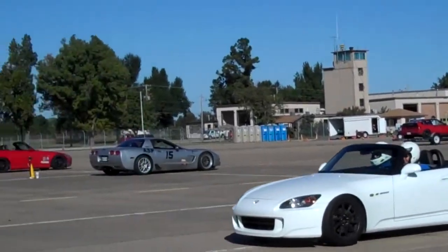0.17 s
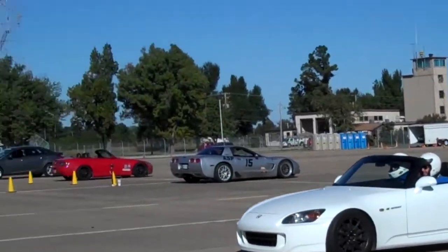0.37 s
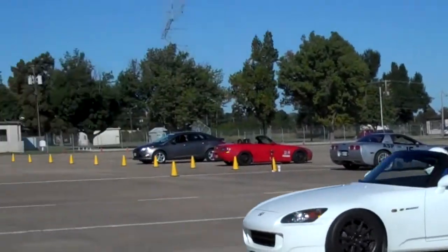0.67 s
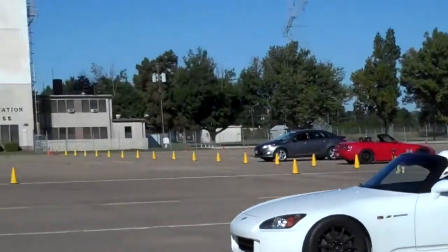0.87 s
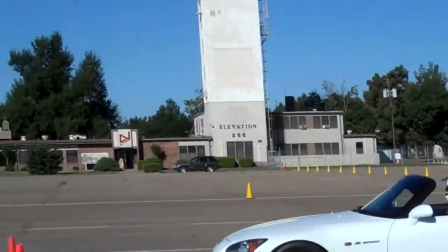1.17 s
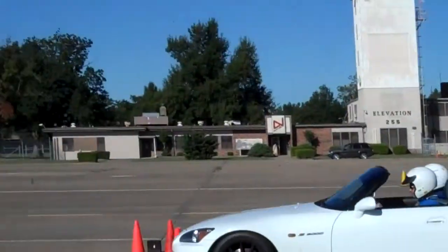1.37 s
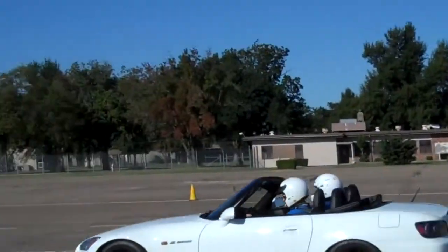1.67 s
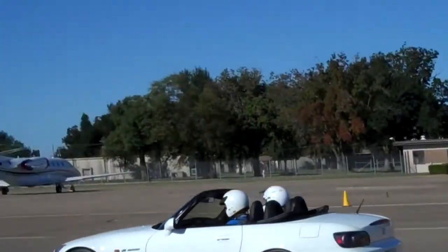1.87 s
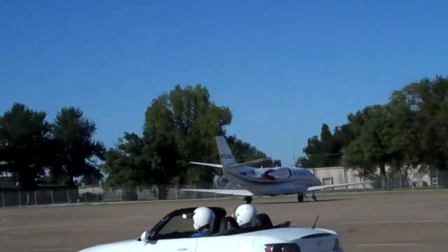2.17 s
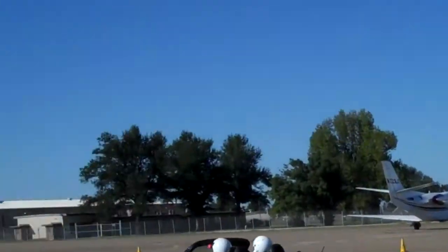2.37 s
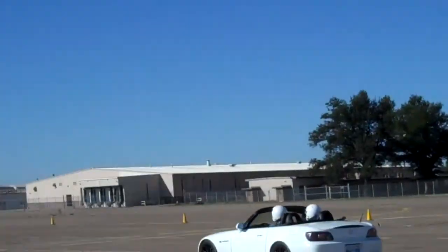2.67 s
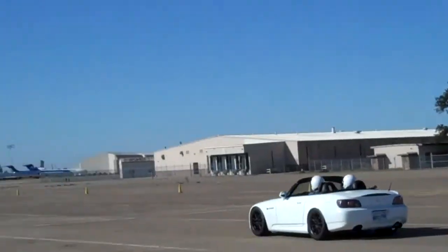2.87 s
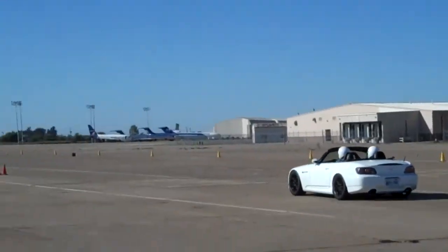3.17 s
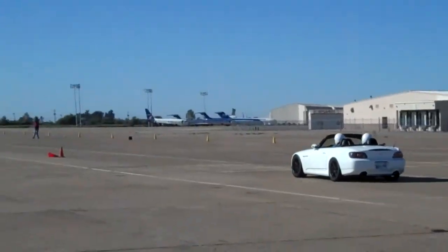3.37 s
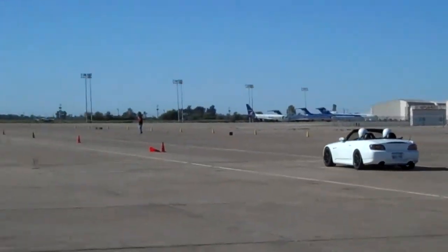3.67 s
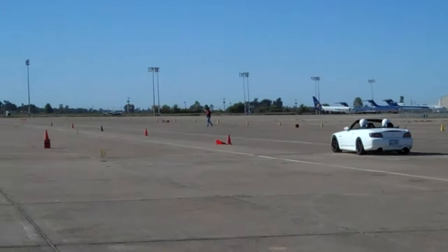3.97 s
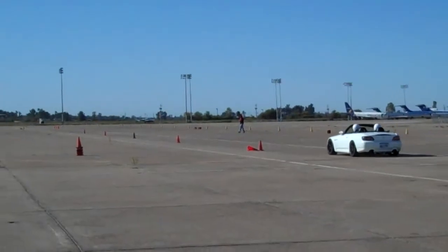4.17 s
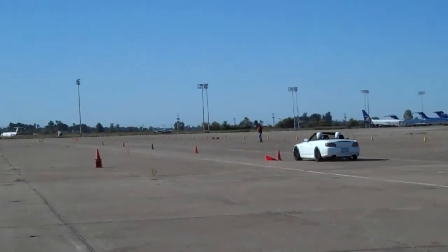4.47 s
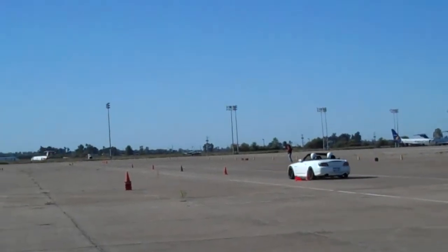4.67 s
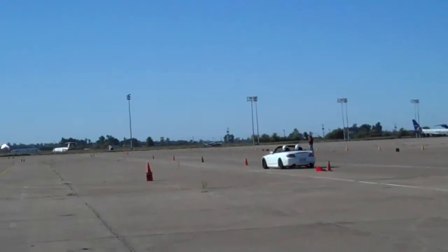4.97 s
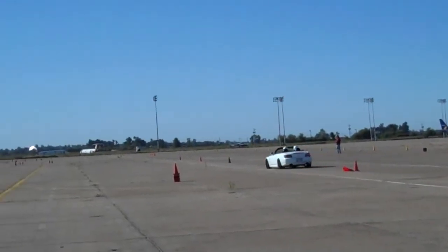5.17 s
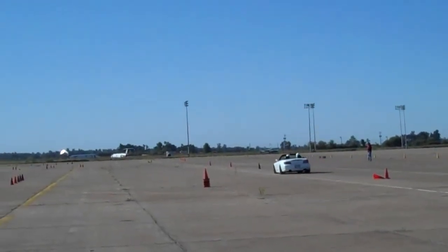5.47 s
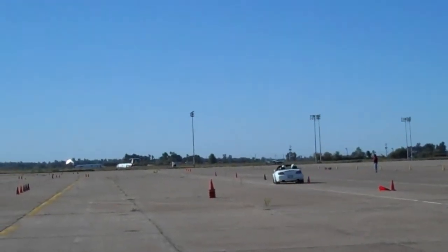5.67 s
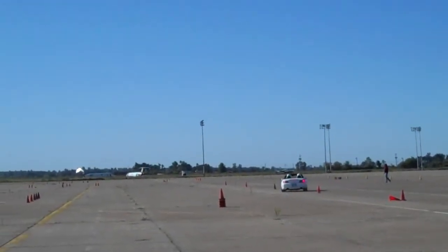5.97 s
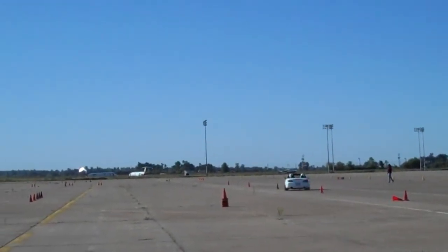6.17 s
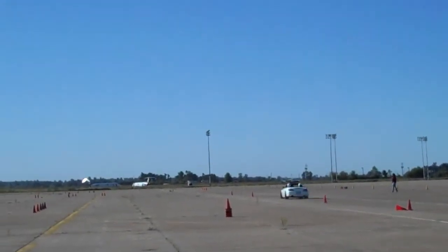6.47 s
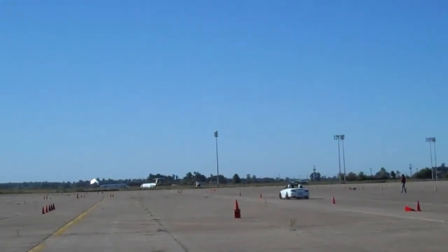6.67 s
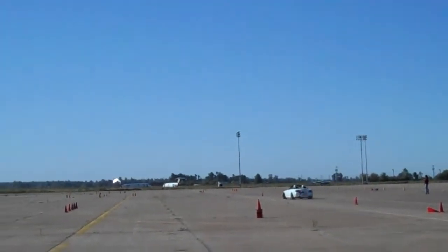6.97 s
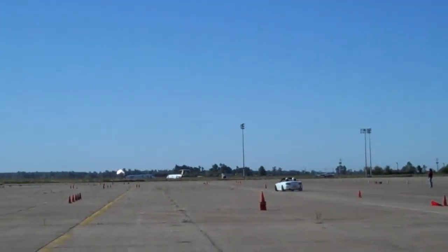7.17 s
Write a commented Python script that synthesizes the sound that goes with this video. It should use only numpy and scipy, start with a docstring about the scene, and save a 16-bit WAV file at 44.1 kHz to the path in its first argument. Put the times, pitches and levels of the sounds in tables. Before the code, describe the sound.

A small sports car starts with popping, uneven firings and bright tyre scrub, then revs out first gear in a rising bark. The throttle closes, a short burble marks the shift, and a lower note climbs again, thinner and farther off. It lifts and wavers at the end. The open airfield is faintly noisy, and wind increasingly flutters and thuds on the unprotected microphone.

```python
"""Open sports car launching on an airfield

A four-cylinder car launches with hollow pops, revs out first gear, shifts with a burble, pulls through
second and lifts off. Firing pulses build its note, rasp, bite, snarl and growl; shaped noise makes the
tyres hissing on concrete, the far field and the gusts. Each of two microphone ports has its own wind,
mostly stronger on the right, with single thumps of pressure on top; small sharp ticks complete the scene.
"""
import sys
import numpy as np
from scipy import signal
from scipy.fft import rfft, irfft, next_fast_len
from scipy.io import wavfile
from scipy.ndimage import uniform_filter1d

SR = 44100
rng = np.random.default_rng(int(sys.argv[2]) if len(sys.argv) > 2 else 0)


def digitize_waveform(pressure):
    """Quantize a signal to 16-bit integers and store it at the path in sys.argv[1].

    Rows of a 2-D input are taken as channels; values are limited to [-1, 1].
    """
    field = np.atleast_2d(pressure).T
    bounded = np.clip(field, -1, 1)
    quanta = np.round(bounded * 32767).astype(np.int16)
    wavfile.write(sys.argv[1], SR, quanta)


N = 323253

# engine speed before its fine wobble: t/s, firing rate f/Hz
FIRING_RATE = [(0, 73.5), (.25, 77.9), (.36, 91.96), (.6, 104.4), (.72, 113.7), (1.1, 139.7), (1.61, 174.1),
               (2.53, 235.9), (2.8, 219.7), (3.18, 186.2), (3.28, 152.4), (3.44, 167), (3.58, 165.3),
               (4.7, 200.9), (5.13, 217.7), (5.22, 208.2), (5.8, 197.7), (5.95, 202.9), (6.1, 193.9),
               (6.3, 194.5), (6.5, 186.3), (6.8, 186.2), (7.05, 188.1), (7.33, 191.8)]
# exhaust loudness before the trims of each layer: t/s, low boom level/dB, bark level/dB
EXHAUST_LEVELS = [(0, -27.5, -34), (.1, -20.5, -24.5), (.26, -17.5, -27.5), (.4, -14, -19.5),
                  (.95, -12, -18.5), (1.08, -10, -26), (1.2, -12, -19), (1.65, -14.5, -15),
                  (2.15, -17, -15), (2.53, -26.5, -21), (2.61, -38, -37), (3.17, -41, -30),
                  (3.26, -19.5, -39), (3.4, -28.5, -23.5), (3.68, -30.5, -22), (4.0, -25.5, -20),
                  (4.37, -21, -17.5), (4.7, -21.5, -19), (5.145, -21.5, -17.5), (5.19, -30, -38),
                  (5.42, -29.5, -23), (5.95, -34, -24.5), (6.08, -29, -40), (6.24, -28.5, -27),
                  (6.5, -28.5, -40), (6.66, -26.5, -32.5), (6.86, -30, -35), (7.05, -23.5, -26)]
# driver on the throttle: start t/s, end t/s, opening (0-1)
THROTTLE_PULLS = [(-.1, 2.56, 0.94), (3.23, 5.16, 1), (7.09, 7.5, 0.53)]
PEDAL_S = 0.06  # time to open or close the throttle
# middle revs where the engine runs rough: firing rate f/Hz, roughness (0-1)
ROUGH_REVS = [(120, 0), (135, 1), (152, 1), (168, 0)]

# firing harmonics 1 to 4: trim/dB, share following bark rather than boom (0-1), change off throttle/dB
HARMONICS = [(-2, 0.08, 1.5), (-2, 0.25, -1.5), (0.6, 1, -0.5), (-1, 1, -33)]
# how strongly the exhaust passes an overtone as it sweeps: f/Hz, gain/dB
OVERTONE_GAIN = [(170, -14.5), (195, -0.5), (220, -4.5), (305, -17), (345, -5.5), (375, -5.5), (398, -9),
                 (440, -13), (480, -14.5), (570, -5.5), (650, -4.5), (720, -4), (780, -5.5), (850, -21.5),
                 (885, -39), (915, -9), (950, -8)]
WAVER_DB, ROUGH_WAVER_DB = 1.1, 3  # swell of each overtone, and its increase when running rough
# exhaust pipe resonances: f/Hz, nominal width/Hz, gain/dB
PIPE_RESONANCES = [(378, 196, 1), (618, 150, 7.5), (806, 19, -13.5), (1390, 68, -22)]
# strength of each firing in turn: gain
CYLINDER_STRENGTHS = [1.3, .97, .85, .88]

# spectrum of the rasp of the tailpipes: f/Hz, gain/dB
RASP_SPECTRUM = [(400, 31.5), (650, 38.5), (880, 12.5), (1030, -1), (1230, 5.5), (1430, -1), (1580, -19),
                 (1850, -19.5), (2080, -15), (2300, -18), (2650, -16), (3300, -77)]
RASP_OFF_DB = -13  # change of the rasp with the throttle shut
# spectrum of the biting tailpipe overtones: f/Hz, gain/dB
BITE_SPECTRUM = [(800, -11), (1100, 1.5), (1250, 7), (1400, 18.5), (1600, 7), (1850, -16), (2080, -14),
                 (2300, -18.5), (2650, -16.5), (3200, -40.5)]
# loudness of the bite, near 1.4 kHz: t/s, level/dB
BITE_LEVEL = [(1.0, -66), (1.3, -41), (1.58, -32), (1.97, -31), (2.08, -27.5), (2.22, -29.5), (2.31, -34.5),
              (2.52, -32), (2.62, -71), (3.35, -59), (3.65, -50), (4.0, -44.5), (4.2, -52), (4.42, -60),
              (4.52, -36.5), (4.73, -50), (4.88, -38), (5.11, -42), (5.22, -44.5), (5.6, -61.5),
              (7.03, -55), (7.11, -47), (7.22, -43), (7.33, -63)]
# strength of each firing in turn as it reaches the tailpipes: gain
TAILPIPE_STRENGTHS = [1.9, .8, .7, .5]
# loudness of the snarl of gas above the bite: t/s, level/dB
SNARL_LEVEL = [(.3, -44), (.72, -43), (.94, -32), (1.04, -48), (1.6, -43), (1.85, -39), (2.05, -33.5),
               (2.25, -42), (2.52, -43), (2.62, -61), (3.4, -59), (3.66, -48), (4.0, -42), (4.22, -47),
               (4.37, -43.5), (4.64, -44.5), (4.75, -50), (5.09, -40.5), (5.2, -55), (7.03, -71),
               (7.125, -47.5), (7.33, -53)]
# strength of each puff of gas in turn: gain
PUFF_STRENGTHS = [1.9, .3, 1.0, .2]
# resonances of gas rushing out of the tailpipes: f/Hz, nominal width/Hz, gain/dB
MOUTH_RESONANCES = [(1887, 470, 6.5), (2550, 300, -20.5)]
SCATTER_S = .012  # decay time of the silencer echoes, to 1/e
LUMPS_DB = -10  # lumps from the unequal cylinders, within the growl
ALTERNATION = 0.034  # strong-weak swing of the firings with the throttle shut
OVERRUN_ORDER, OVERRUN_DB = 3.5, -14.5  # multiple of the firing rate; wavering level before the growl trim

# tyres on concrete, before layer trims: t/s, roar level/dB, hiss level/dB
TYRE_LEVELS = [(0, -35.5, -29.5), (.5, -35.5, -23.5), (.97, -24, -22.5), (1.01, -29.5, -32.5),
               (1.6, -28, -36), (2.1, -26, -37.5), (2.5, -25.5, -45), (2.9, -39, -47.5), (3.55, -44.5, -63),
               (3.9, -55, -70), (4.3, -50, -60), (4.55, -44, -66), (5.3, -43, -58), (7.33, -49.5, -62.5)]
# spectrum of the tyre roar: f/Hz, gain/dB
ROAR_SPECTRUM = [(300, 11), (800, 12.5), (1150, 2.5), (1600, 1), (2300, -1), (3500, -7), (5000, -10.5),
                 (7000, -7.5), (14000, -78.5)]
# spectrum of the tyre hiss: f/Hz, gain/dB
HISS_SPECTRUM = [(2500, -6), (4500, -7), (5600, -6.5), (6400, -0.5), (7100, -5), (7700, -2), (8400, -30.5),
                 (9300, -17), (11500, -31.5), (14400, -41)]

# spectrum of the distant paddock: f/Hz, gain/dB
FIELD_SPECTRUM = [(30, 5.5), (120, 17), (300, 6), (700, -3.5), (1050, -10.5), (1500, -12), (2500, -31.5),
                  (5000, -31.5), (14000, -48)]

# gusts at the ports, before waver and trim: start t/s, length/s, left level/dB, right level/dB
GUSTS = [(1.197, 0.79, -22.5, -19.5), (2.012, 0.63, -26.5, -18.5), (2.339, 0.37, -23, -15.5),
         (2.752, 0.18, -41, -18.5), (2.96, 0.21, -39, -16), (3.12, 0.36, -32, -13.5),
         (3.562, 0.19, -45, -15), (3.856, 0.2, -34, -16), (4.072, 0.09, -35, -14.5),
         (4.32, 0.059, -44, -19), (4.542, 0.21, -38, -18.5), (4.834, 0.094, -22.5, -19.5),
         (4.982, 0.21, -25.5, -22), (5.203, 0.069, -34, -23.5), (5.956, 0.06, -31, -21),
         (6.11, 0.09, -32, -36), (6.337, 0.043, -32, -39), (6.939, 0.076, -45, -17.5),
         (7.225, 0.033, -31, -15)]
GUST_ATTACK_S, GUST_RELEASE_S = .015, .09
BREEZE_FROM_S, BREEZE_DB, CALM_DB = 1.15, -37, -58  # light air between gusts, calm before; before trim
# spectrum of the shoves of a gust: f/Hz, gain/dB
GUST_SPECTRUM = [(20, -11), (60, 2), (110, 0.5), (170, 2.5), (260, -3), (400, -10.5), (700, -14),
                 (1500, -61), (12000, -83.5)]
# spectrum of air tearing at a port: f/Hz, gain/dB
TEAR_SPECTRUM = [(100, -31), (300, 7), (600, -11.5), (1200, -7.5), (2500, -23.5), (14000, -71)]
# spectrum of the large eddies: f/Hz, gain/dB
RUMBLE_SPECTRUM = [(20, -10), (45, -3.5), (80, -0.5), (150, -5.5), (14000, -150)]

# hollow pops during the launch: t/s, level/dB, ring f/Hz
POPS = [(.036, -21, 953), (.062, -23, 807), (.092, -18, 610), (.150, -20.5, 740), (.287, -18, 860),
        (.342, -20, 867), (.481, -18, 850), (.557, -17, 840), (.599, -18, 730), (.659, -14, 650),
        (.742, -15.5, 716)]
POP_RISE_S, POP_GRIT = .0055, .35  # time to the peak, share of noise in the ring

# small sharp ticks: t/s, level/dB, time to fall 60 dB/s
TICKS = [(.111, -20, .04), (2.605, -27, .02), (2.632, -28, .02), (2.668, -27, .03), (2.687, -29, .02),
         (3.182, -34, .03), (3.241, -34, .09), (3.280, -32, .025), (3.290, -37, .025), (3.573, -32, .035),
         (4.389, -46, .025), (6.928, -41, .07)]
TICK_RISE_S = .0015

# spells of ragged firing at the launch, the shift and the lift: centre t/s, half-width/s, level/dB
BURBLES = [(0.976, 0.024, -15.5), (1.017, 0.013, -15.5), (3.262, 0.029, -23.5), (5.304, 0.063, -30.5)]

# brief drops of car, field and wind: lowest point t/s, recovery/s, depth/dB
DIPS = [(1.915, 0.13, -4), (2.261, 0.08, -4), (3.375, 0.13, -10), (3.72, 0.17, -8.5), (4.189, 0.15, -5),
        (4.41, .13, -2)]
DIP_FALL_S = 0.019

# single eddies thumping a port: t/s, level/dB, left minus right/dB, width of push/s, torn edge share
THUMPS = [(2.631, -15, -14.5, .0005, .4), (2.665, -16.5, -10.5, .0006, .5), (2.731, -13, -13, .001, .25),
          (2.796, -15, -12, .0008, .2), (2.809, -14, -12, .0008, .25), (2.866, -17, -12, .001, .2),
          (2.942, -16.5, -12.5, .0005, .35), (2.983, -14.5, -12.5, .0006, .25),
          (3.017, -13, -15.5, .0006, .3), (3.183, -11.5, -14.5, .0015, .3), (3.238, -14, -3, .0006, .3),
          (3.365, -10, -14, .002, .07), (3.591, -10, -14, .0015, .07), (3.634, -9, -14, .0013, .06),
          (3.707, -10, -14, .0013, .07), (4.018, -11, -15, .0018, .05), (4.086, -10, -15, .002, .04),
          (4.173, -10, -15, .0024, .03), (4.39, -11, -15, .0012, .07), (4.905, -11, -8, .001, .15),
          (5.898, -18, -3, .0007, .2), (5.961, -13, -5, .0012, .08), (5.972, -15, -5, .0011, .15),
          (6.144, -23, 8, .0008, .5), (6.183, -21, 8, .0008, .35), (6.496, -11.5, 9, .00075, .3),
          (6.655, -17, -12, .002, .05), (6.834, -13, -22, .0008, .13), (6.847, -19, -17, .0005, .35),
          (6.872, -13, -20, .0009, .07), (6.888, -14.5, -13.5, .0008, .25), (6.959, -10, -14.5, .0007, .18),
          (6.982, -13, -12, .0015, .06), (6.991, -14, -8, .0007, .35), (7.023, -9, -10, .0015, .06),
          (7.047, -14, -7, .0007, .2), (7.245, -13, -10, .0012, .08), (7.285, -9, -8.5, .0009, .08)]
EDGE_HZ = 1000  # the torn edge of a thump falls away above this

TOP_HZ = 14250  # top of the final passband


def undb(db):
    """Decibels to gain."""
    return 10 ** (np.asarray(db) / 20)


def unit(x):
    """Scale to rms 1."""
    return x / np.sqrt(np.mean(x ** 2))


def steady(x):
    """Hold the rms near 1 through time."""
    return x / np.sqrt(uniform_filter1d(x ** 2, size=6000))


def curves(table):
    """The columns of a table as one value a sample."""
    s, *columns = np.transpose(table)
    return [np.interp(np.arange(N) / SR, s, c) for c in columns]


def gate(start, end, attack_s, release_s):
    """Rise to 1 around the start, hold, fall after the end."""
    t = np.arange(N) / SR
    rise = (t - start) / attack_s + .5
    fall = 1 - (t - end) / release_s
    return np.clip(np.minimum(rise, fall), 0, 1)


def walk(rate):
    """Smooth random drift of rms near 1, taking a new random value about rate times a second."""
    k = int(SR / rate)
    steps = np.repeat(rng.standard_normal(N // k + 1), k)
    return unit(uniform_filter1d(uniform_filter1d(steps, k), k)[:N])


def colour(x, points):
    """Filter by a spectrum of (f/Hz, gain/dB) points; rms about 1."""
    hz, db = np.transpose(points)
    size = next_fast_len(N)
    f = np.maximum(np.fft.rfftfreq(size, 1 / SR), 1)
    gain = undb(np.interp(np.log(f), np.log(hz), db))
    return unit(irfft(rfft(x, size) * gain, size)[..., :N])


def band(x, hz, width_hz):
    """One resonance, gain 1 at its centre."""
    return signal.lfilter(*signal.iirpeak(hz, hz / width_hz, fs=SR), x)


def stereo_noise(side):
    """White noise, partly unrelated between the ports."""
    mid, apart = rng.standard_normal((2, N))
    return mid + side * apart * np.array([[1], [-1]])


def panned(pan_db):
    """Gains of the two ports; pan is left minus right."""
    return undb(np.array([[pan_db], [-pan_db]]) / 2)


def add(out, s, sound):
    """Mix a short sound in at time s."""
    start = int(s * SR)
    out[:, start:start + sound.shape[-1]] += sound[..., :N - start]


def throttle_shut():
    """How far the driver is off the throttle: 1 is fully shut."""
    starts, ends, openings = np.transpose(THROTTLE_PULLS)
    pulling = np.array([gate(start, end, PEDAL_S, PEDAL_S) for start, end in zip(starts, ends)])
    return 1 - np.clip(openings @ pulling, 0, 1)


def firing_note(hz, turn, boom_level, bark_level, shut, rough):
    """Strong low harmonics of the firing rate, shaped by the exhaust as they sweep through it."""
    gain_hz, gain_db = np.transpose(OVERTONE_GAIN)
    wave, note = 1, 0
    for k, (trim_db, share, off_db) in enumerate(HARMONICS):
        wave = wave * turn
        level = boom_level + share * (bark_level - boom_level) + trim_db + off_db * shut
        if k > 0:
            level = level + np.interp(np.log((k + 1) * hz), np.log(gain_hz), gain_db)
            level = level + WAVER_DB * walk(9) + ROUGH_WAVER_DB * rough * walk(28)
        # the pipe delays each harmonic differently, which rounds the pulse
        delayed = (wave * np.exp(1j * np.pi * k * k / len(HARMONICS))).real
        note = note + np.sqrt(2) * undb(level + .8 * walk(25)) * delayed
    return note


def firing_pulses(turn):
    """Pulses as 18 equal harmonics: the low ones that carry the note, and the high ones above."""
    wave, low, high = 1, 0, 0
    for k in range(18):
        wave = wave * turn
        if k < len(HARMONICS):
            low = low + wave.real
        else:
            high = high + wave.real
    return low, high


def pipe(x):
    """The exhaust system rings; each resonance acts twice, so the valleys stay dark."""
    out = 0
    for hz, width, db in PIPE_RESONANCES:
        once = band(x, hz, 1.24 * width)
        out = out + undb(db) * band(once, hz, 1.24 * width)
    return out


def tailpipe_rasp(high, strength, chance, hz, shut, rasp_db=-8.5, high_rev_rasp_db=-15):
    """High firing harmonics rasp, fading as rising revs carry them past the pipe resonances."""
    level = rasp_db + high_rev_rasp_db * np.interp(hz, [125, 185], [0, 1]) + RASP_OFF_DB * shut
    return undb(level) * steady(colour(high * (strength + 0.15 * chance), RASP_SPECTRUM))


def tailpipe_bite(high, count, chance, bite_rough=0.24):
    """Uneven firings drive a narrow group of tailpipe overtones."""
    level, = curves(BITE_LEVEL)
    uneven = np.take(TAILPIPE_STRENGTHS, count % len(TAILPIPE_STRENGTHS))
    return undb(level) * steady(colour(high * (uneven + bite_rough * chance), BITE_SPECTRUM))


def silencer(x):
    """Dense, quickly dying echoes run the puffs together."""
    t = np.arange(SR // 20) / SR
    echoes = rng.standard_normal(len(t)) * np.exp(-t / SCATTER_S)
    return signal.fftconvolve(x, echoes)[:N]


def gas_snarl(high, turn, count, chance):
    """Each firing drives a rough puff of gas through the silencer and the tailpipe resonances."""
    level, = curves(SNARL_LEVEL)
    puffs = high * (np.take(PUFF_STRENGTHS, count % len(PUFF_STRENGTHS)) + 0.22 * chance)
    gas = .3 * rng.standard_normal(N) * (1 + turn.real) ** 2
    puffs = silencer(puffs + gas)
    rush = sum(undb(db) * band(band(puffs, f, width), f, width) for f, width, db in MOUTH_RESONANCES)
    return undb(level) * steady(rush)


def growl(pulses, turn, count, strength, chance, shut, rough,
          ragged_db=-20, rough_ragged_db=7, gas=.2, growl_db=-4):
    """Unequal cylinders and ragged combustion ring the pipe."""
    # unequal cylinders repeat every four firings: fine lines between the harmonics
    uneven = strength - np.mean(CYLINDER_STRENGTHS)
    # off the throttle the firings also alternate strong and weak
    alternating = ALTERNATION * shut * (-1.) ** count
    lumps = steady(pipe(pulses * (uneven + alternating)))
    # combustion is most ragged in the middle revs
    ragged = steady(pipe(pulses * chance + gas * rng.standard_normal(N) * (1 + turn.real) ** 2))
    ragged = ragged * undb(ragged_db + rough_ragged_db * rough)
    return undb(growl_db) * (undb(LUMPS_DB) * lumps + ragged)


def overrun_tone(firings, shut, growl_db=-4):
    """A wavering half-order tone sounds with the throttle shut."""
    level = OVERRUN_DB + 2 * walk(18)
    tone = np.cos(2 * np.pi * OVERRUN_ORDER * firings)
    return undb(growl_db) * shut ** 2 * undb(level) * tone


def engine(wobble=0.0011):
    """Each firing sends a pulse down the pipe, heard as note, rasp, bite, snarl and growl."""
    hz, = curves(FIRING_RATE)
    boom_level, bark_level = curves(EXHAUST_LEVELS)
    shut = throttle_shut()
    rough = np.interp(hz, *np.transpose(ROUGH_REVS))
    firings = np.cumsum(hz * (1 + wobble * walk(45))) / SR
    turn = np.exp(2j * np.pi * firings)
    count = np.round(firings).astype(int)
    strength = np.take(CYLINDER_STRENGTHS, count % len(CYLINDER_STRENGTHS))
    chance = rng.standard_normal(N)[count]  # one random strength a firing
    low, high = firing_pulses(turn)
    note = firing_note(hz, turn, boom_level, bark_level, shut, rough)
    bite = tailpipe_bite(high, count, chance)
    snarl = gas_snarl(high, turn, count, chance)
    bark = tailpipe_rasp(high, strength, chance, hz, shut)
    bark = bark + growl(low + high, turn, count, strength, chance, shut, rough)
    bark = bark + overrun_tone(firings, shut, growl_db=-4)
    return (note + bite + snarl + undb(bark_level) * bark) * panned(-.3)


def tyres(roar_db=3, hiss_db=-1, grit_db=1.0, sizzle_db=-3.5):
    """Rubber scrubs over gritty concrete; a bright sizzle reaches the left port."""
    roar_level, hiss_level = curves(TYRE_LEVELS)
    grit = undb(grit_db * walk(900))
    roar = undb(roar_level + roar_db) * colour(stereo_noise(0.51) * grit, ROAR_SPECTRUM)
    hiss = undb(hiss_db) * colour(stereo_noise(0.085) * grit, HISS_SPECTRUM)
    sizzle_spectrum = [(6500, -72), (7700, 11.0), (9300, -4.0), (14000, -10.0)]
    sizzle = colour(rng.standard_normal(N) * grit, sizzle_spectrum)
    left_only = np.array([[1], [0]])
    return roar + undb(hiss_level) * (hiss + undb(sizzle_db) * sizzle * left_only)


def field(field_db=-29, waver_db=4.0):
    """Far engines and open air as wide, wavering noise."""
    level = field_db + waver_db * walk(15)
    return undb(level) * colour(stereo_noise(1.0), FIELD_SPECTRUM)


def wind(wind_db=-1, eddy_db=2.5, tear_db=-13.5, rumble_db=5, waver_db=2):
    """Turbulence pushes on each port separately; the air crackles on the crest of every shove."""
    force = undb(np.where(np.arange(N) / SR > BREEZE_FROM_S, BREEZE_DB, CALM_DB))
    for s, length, *port_db in GUSTS:
        swell = gate(s, s + length, GUST_ATTACK_S, GUST_RELEASE_S) ** 2
        force = np.maximum(force, undb(port_db)[:, None] * swell)
    ports = []
    for level in 20 * np.log10(force):
        level = level + waver_db * walk(20)
        shoves = steady(colour(rng.standard_normal(N) * undb(eddy_db * walk(160)), GUST_SPECTRUM))
        crests = np.tanh(shoves ** 2 / 2) ** 2
        crackle = colour(rng.standard_normal(N) * crests, TEAR_SPECTRUM)
        # strong gusts carry larger eddies, so the rumble grows faster than the rest
        rumble = undb(1.7 * level + rumble_db) * colour(rng.standard_normal(N), RUMBLE_SPECTRUM)
        ports.append(undb(level + wind_db) * (shoves + undb(tear_db) * crackle) + rumble)
    return np.array(ports)


def pops():
    """Single ragged firings at the launch, each a short hollow ring."""
    out = np.zeros((2, N))
    t = np.arange(SR // 20) / SR
    swell = (t / POP_RISE_S * np.exp(1 - t / POP_RISE_S)) ** 2
    for s, db, hz in POPS:
        grit = unit(band(band(rng.standard_normal(len(t)), hz, hz / 2), hz, hz / 2))
        ring = (1 - POP_GRIT) * np.sin(2 * np.pi * hz * t) + POP_GRIT * grit
        add(out, s - POP_RISE_S / 2, undb(db) * swell * ring)
    return out


def ticks():
    """Short bright bursts of noise that die quickly."""
    out = np.zeros((2, N))
    t = np.arange(SR // 5) / SR
    for s, db, t60 in TICKS:
        rise = 1 - np.exp(-t / TICK_RISE_S)
        add(out, s, undb(db) * rise * np.exp(-np.log(1000) * t / t60))
    spectrum = [(500, 3), (3000, 0), (5000, -6), (7000, -6), (9000, -18), (14000, -27)]
    return out * colour(stereo_noise(.4), spectrum)


def burbles():
    """Ragged combustion shakes the pipe for a moment: swells of noise through its resonances."""
    t = np.arange(N) / SR
    swell = sum(undb(db) * np.exp(-((t - s) / width) ** 2) for s, width, db in BURBLES)
    return swell * unit(pipe(stereo_noise(0.093)))


def dips():
    """Gain of the brief drops in level: a sudden fall, a hold, then a recovery."""
    t = np.arange(N) / SR
    level = 0
    for s, recovery, db in DIPS:
        corners = [s - DIP_FALL_S, s, s + recovery / 2, s + recovery]
        level = level + db * np.interp(t, corners, [0, 1, 1, 0])
    return undb(level)


def thumps():
    """An eddy hits a port: one dull push and pull of pressure with a torn edge."""
    out = np.zeros((2, N))
    t = np.arange(1024) / SR
    for s, db, pan_db, width_s, tear in THUMPS:
        u = (t - .008) / width_s
        edge = unit(signal.lfilter(*signal.butter(3, EDGE_HZ, fs=SR), rng.standard_normal(len(t))))
        push = 2.5 * u * np.exp(-u ** 2) + tear * edge * np.exp(-(u / 3) ** 2)
        gains = panned(pan_db)
        add(out, s - .006, undb(db) * push * gains / gains.mean())
    return out


def scene():
    """The car, heard a sample later at the left port, with field and wind, then thumps and ticks."""
    left, right = engine() + pops() + burbles() + tyres()
    car = np.array([np.roll(left, 1), right])
    return (car + field() + wind()) * dips() + thumps() + ticks()


def record(dry):
    """Clip at full scale, then cut the top with a steep low-pass."""
    low_pass = signal.ellip(10, .2, 80, TOP_HZ, fs=SR, output="sos")
    return signal.sosfilt(low_pass, np.clip(dry, -1, 1))


dry = scene()
out = record(dry)
digitize_waveform(out)
```